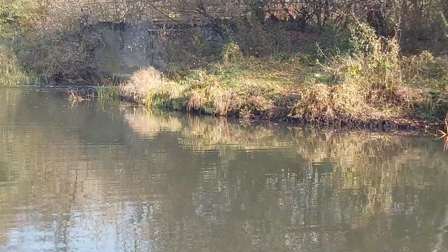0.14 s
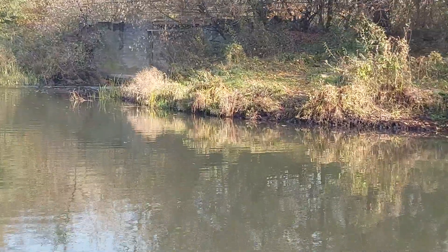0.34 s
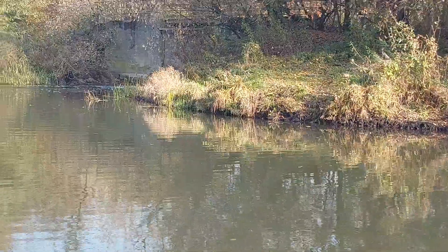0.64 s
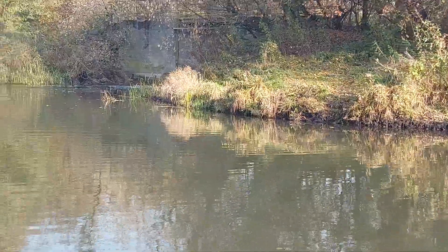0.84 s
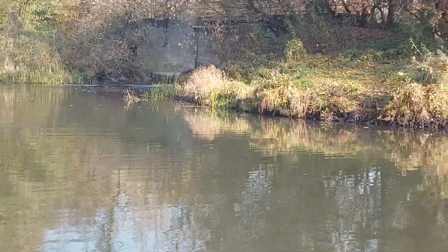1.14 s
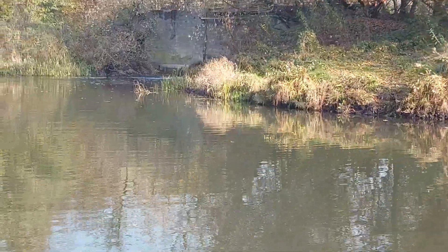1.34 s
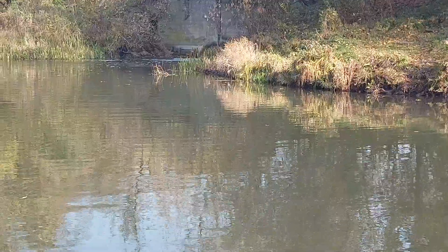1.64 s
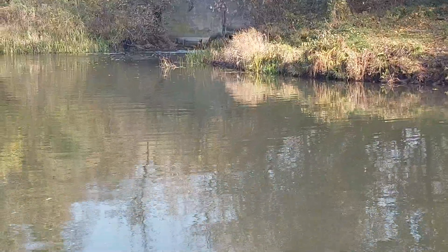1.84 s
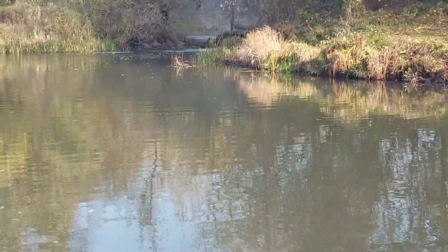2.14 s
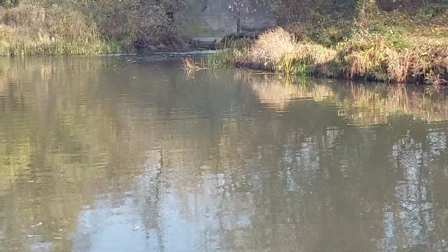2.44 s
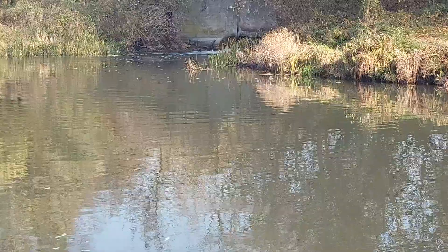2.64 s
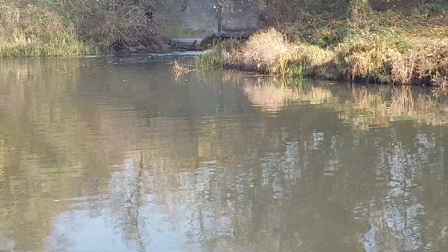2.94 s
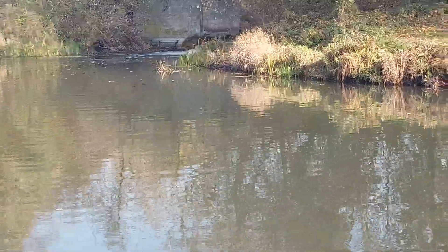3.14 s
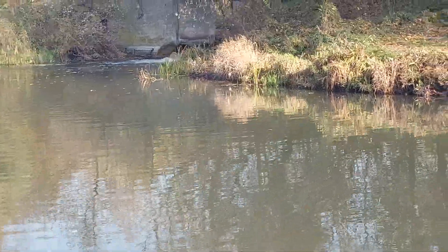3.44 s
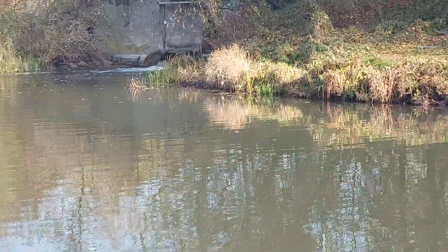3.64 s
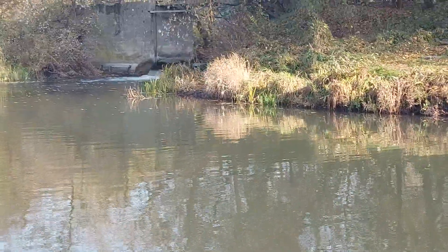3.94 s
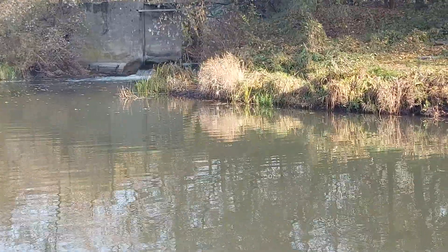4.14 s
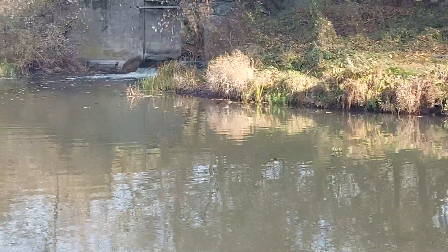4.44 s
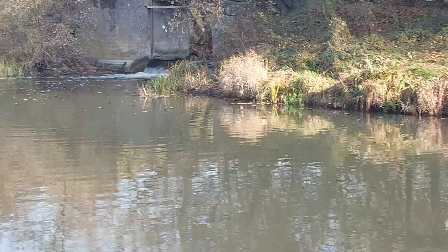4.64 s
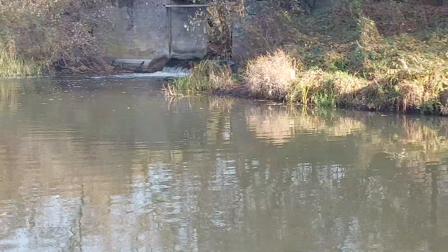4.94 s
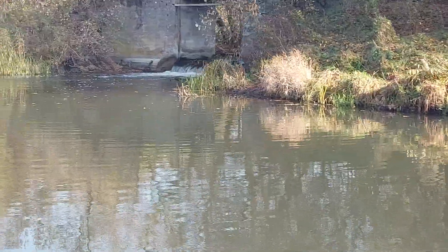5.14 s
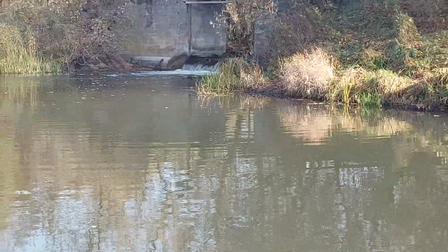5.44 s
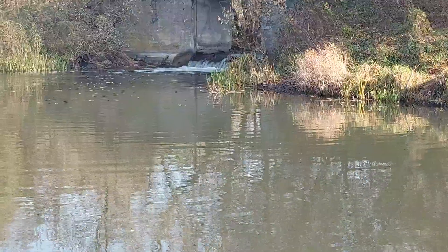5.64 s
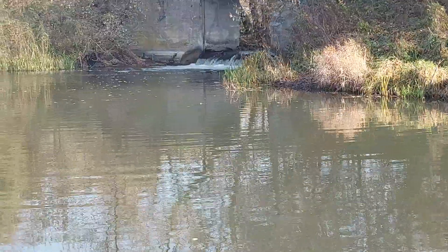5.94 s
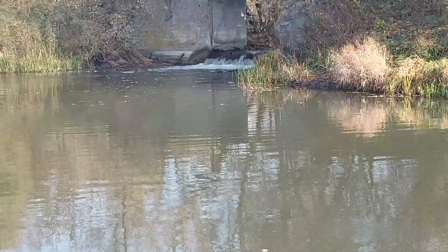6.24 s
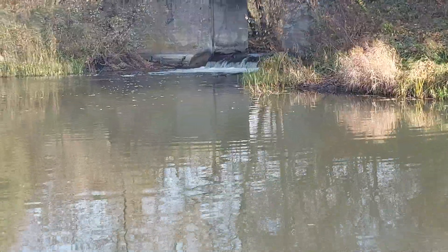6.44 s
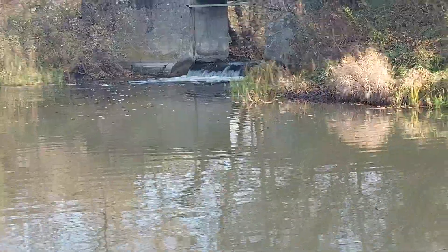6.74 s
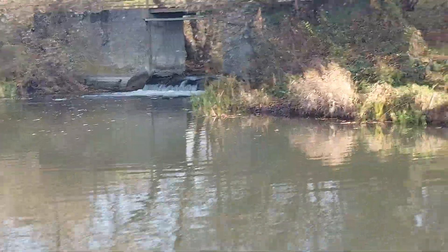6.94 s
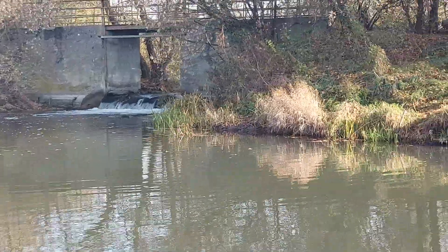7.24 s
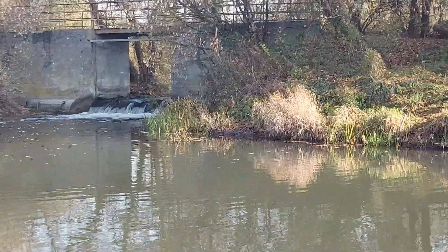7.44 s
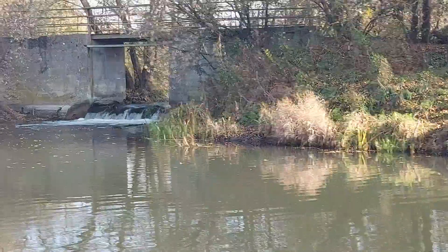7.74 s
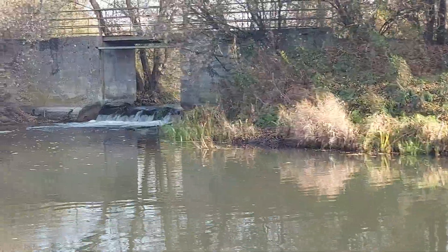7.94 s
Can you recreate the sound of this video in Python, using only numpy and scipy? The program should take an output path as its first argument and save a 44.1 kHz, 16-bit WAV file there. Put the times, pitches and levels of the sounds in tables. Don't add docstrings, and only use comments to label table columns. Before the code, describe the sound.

Throughout about 8 seconds, a small outboard motor runs at unchanging cruising speed, close to a handheld phone outdoors. Its deep, buzzy drone, pulsing about 33 times a second, wavers slightly as water and air pockets cover the exhaust, with gurgling bubbles, faint gear whine and soft rapid valve ticking. Wake wash and fizzing spray run continuously in uneven surges. Dull wavelet knocks come often from 0 to 3.2 s, then between 3.8 and 6.1 s, with another at 7.7 s. Tiny drops snap on the hull, clustering around 4.3-4.9 s and sharpest at 6.0 s. Low wind buffets swell repeatedly from 0.5 to 5 s, with a bigger pop near 5.0 s and another gust near 6.7 s. Very faint high pings from a loose ring occur around 3.7-4.0, 5.1, 5.7-6.0 and 6.9 s. A weir's hiss gradually grows; nothing stops at the end.

```python
import sys
import numpy as np
from scipy import signal
from scipy.fft import rfft, irfft, next_fast_len
from scipy.io import wavfile
from scipy.ndimage import uniform_filter1d, map_coordinates

SR = 44100
rng = np.random.default_rng(int(sys.argv[2]) if len(sys.argv) > 2 else 0)


def field_ratio(decibels):
    return 10 ** (np.asarray(decibels, dtype=float) / 20)


def put_to_file(sound):
    columns = np.atleast_2d(sound).T
    safe = np.clip(columns, -1, 1)
    whole_steps = np.round(safe * 32767)
    wavfile.write(sys.argv[1], SR, whole_steps.astype(np.int16))


N = 357210


# t/s, firing rate/Hz
FIRING_RATE = [(0.0, 33.322), (0.68, 33.329), (1.35, 33.347), (2.02, 33.356), (2.7, 33.407), (3.37, 33.326),
               (4.05, 33.275), (4.72, 33.428), (5.4, 33.408), (6.07, 33.397), (6.75, 33.266),
               (7.42, 33.272), (8.1, 33.301)]
# t/s, load/dB, cover/dB
OUTLET_WATER = [(0.0, -2.5, -11), (0.47, 2, 1.5), (0.84, -2.5, -4.8), (1.43, 3, 2.2), (1.59, 0, 4.5),
                (2.58, 1.5, 2), (3.29, -0.7, 5), (3.99, 0, -6.5), (4.31, -3.5, 2), (4.63, -0.2, 0),
                (5.05, -1.5, 2.5), (5.29, 0.5, -4), (5.77, 1, 2.6), (6.0, 0.1, -3), (7.01, 0.5, 5),
                (7.35, 0.9, -3), (7.57, 0.3, 5), (8.1, -0.5, -4.5)]
# order, peak level/dB, change per load/(dB/dB), change per cover/(dB/dB), bubble flutter/dB
MAIN_ORDERS = [(3, -19.5, 1.04, -0.03, 1), (4, -21.5, -0.2, .95, 1.15), (5, -29, 0, -.5, 0.6)]
# order, peak level/dB
OTHER_ORDERS = [(1, -45.5), (2, -31), (6.5, -47), (7, -68)]
# order, level against that mode/dB
UPPER_ORDERS = [(8, -11), (9, -7), (10, -8.5), (12, -20)]
# t/s, length/s, 5th order change/dB, 4th order change/dB, 4th order lead/rad
AIR_POCKETS = [(.2, .08, 1, 4, 0), (.85, 0.092, 2.5, -2.5, 1.6), (1.047, .1, 3.5, 3.5, .3),
               (1.267, .08, 1.5, -2.5, -.3), (1.95, .08, -2, 3, 0), (2.652, 0.1, 5, 0, .7),
               (3.494, 0.076, 1.5, -0.5, .3), (3.68, .07, -1, 1.5, 0), (4.207, 0.13, 1.5, 0.5, 1.1),
               (4.43, 0.062, -2, 2, 0), (4.702, 0.33, 1, 0, -.4), (4.95, .08, -4, 0.5, .2),
               (5.32, .06, 0.5, -2, 0), (5.6, 0.5, .6, 0, -1.1), (6.12, .15, 3.5, -1.5, .5),
               (6.65, .1, 2, 1, 0), (7.55, 0.17, 4, 0.5, 0), (7.95, 0.12, 1.5, -2, .5)]
# t/s, change/dB, length/s
TRANSOM_SWELLS = [
    (.2, 5, 0.65),
    (1.15, 6, .5),
    (2.5, 1, 0.37),
    (5.7, 7, .45),
    (6.7, 4, 0.36),
    (7.8, -5, .15),
]
HULL_SIDES = {2: (2.3, -.1), 4: (1.3, .03), 5: (-1, .12), 6: (3, .12), 8: (3.6, -.08), 9: (-1.1, .25),
              10: (2, .2)}
# f/Hz, width/Hz, level/dB
EXHAUST_LEG = [(118, 25, 0)]
# f/Hz, width/Hz, level/dB
ENGINE_MOUNT = [(50, 15, 0)]
# f/Hz, width/Hz, level/dB
OUTLET_BUBBLES = [(117, 25, 4), (308, 83, -16)]
# f/Hz, width/Hz, level/dB
ENGINE_COVER = [(1800, 250, 4.5), (2770, 1200, -2.5), (5500, 2100, -7.5)]
# f/Hz, peak level/dB
GEAR_TONES = [(1241, -49), (1289, -50), (1307, -52)]
# f/Hz, level per Hz/dB
WASH_COLOUR = [(25, -18), (50, -19), (85, 0), (150, 1.5), (240, -6), (340, -7), (520, -10), (860, -14),
               (1400, -13), (2400, -19.5), (4000, -29.5), (8000, -72)]
# t/s, change/dB, length/s
WAKE_SWELLS = [
    (1.45, 1.9, .12),
    (2.15, -1.5, 0.63),
    (3.0, -0.5, .08),
    (3.13, 2, 0.022),
    (3.55, -1.6, 0.15),
    (4.6, 0, 0.3),
    (5.1, -1.5, .2),
    (6.2, 1.4, 0.66),
    (7.9, -1.1, .2),
]
# f/Hz, level per Hz/dB
SPRAY_COLOUR = [(800, -24), (2000, 0.5), (3400, 2), (4400, -4.5), (6500, -10), (8500, -5), (11000, -12.5),
                (13000, -12.5), (16000, -24)]
# t/s, level over the hiss/dB, length/s
SPRAY_SURGES = [(.1, 3.5, 0.071), (.45, 3, .04), (.65, -3, .05), (.88, 1.5, .06), (1.33, 1.5, .08),
                (1.7, -2, .06), (2.1, 1.2, .3), (2.85, 2.4, .15), (3.5, -2, 0.2), (3.79, -2, .04),
                (4.0, 3, 0.079), (4.28, -2, 0.052), (4.6, 3, 0.23), (5.05, -2, .1), (5.2, 2, 0.046),
                (5.5, 1.6, .05), (5.82, 3.5, .06), (6.0, 2.5, .04), (6.29, 1.5, .04), (6.52, 1.5, 0.17),
                (6.95, -3, .1), (7.12, 2.5, 0.044), (7.4, 2, 0.11), (7.94, 2.5, 0.045)]
# t/s, peak level/dB, left-right/dB, brightness/dB
DROPS = [(0.1534, -37, -3.0, -12), (0.5212, -34, -4.5, -21), (1.1972, -34, -3.5, -19),
         (1.9435, -35, -4.5, -20), (2.382, -29, -3.5, -23), (2.9632, -33, -2.5, -16),
         (3.4047, -35, -2.0, -19), (4.2747, -34, -2.5, -22), (4.3535, -35, 0, -24),
         (4.4194, -39, -2.5, -16), (4.5735, -28, -1.5, -23), (4.7394, -35, -2.5, -16),
         (4.8334, -30, -3.0, -13), (4.8544, -28, -2, -19), (5.1701, -35, -2.5, -18),
         (5.5944, -37, -2.5, -15), (5.7214, -35, -1.5, -17), (5.8754, -33, -4.0, -19),
         (6.0282, -22, -10, -23), (6.0536, -34, -2.5, -21), (6.1295, -32, -1.5, -19),
         (6.2721, -32, -3.0, -22), (6.6664, -30, -1.5, -18), (6.7281, -35, -2.5, -19),
         (6.7984, -34, -1.0, -20), (8.0506, -33, -3.5, -19)]
# t/s, peak level/dB, f/Hz
WAVELETS = [(0.03, -23, 330), (0.508, -21, 293), (0.689, -22, 294), (1.049, -17.5, 318), (1.648, -29, 250),
            (1.828, -24, 256), (2.128, -21, 306), (2.427, -22, 308), (2.846, -26, 332), (3.147, -22, 295),
            (3.809, -18.5, 297), (4.286, -30, 360), (4.496, -22.5, 308), (4.943, -17, 240),
            (5.337, -18.5, 320), (5.603, -20, 231), (6.082, -17, 221), (7.699, -22, 233)]
# t/s, peak level/dB
RING_SHAKES = [(3.7085, -49), (3.8067, -54), (3.8921, -54), (3.9664, -54), (5.0818, -50), (5.7399, -48),
               (5.7573, -49), (5.8047, -46), (5.8144, -51), (6.0137, -47), (6.8528, -50)]
# t/s, level over the calm/dB, length/s
WIND_GUSTS = [(.6, 10, 0.37), (1.12, 12, 0.15), (1.45, 13, .25), (1.8, 10, .2), (2.15, 8, .2),
              (2.72, 15, .3), (3.2, 10, .25), (3.68, 15, 0.23), (4.34, 16, .12), (4.65, 7, .15),
              (4.97, 14, .12), (6.2, 3, .3), (6.74, 11, 0.083), (7.1, 3, .2)]
# t/s, peak level/dB, left-right/dB
WIND_POPS = [
    (1.945, -29, 5),
    (2.69, -29, -6),
    (4.86, -32, 6),
    (4.99, -17, 10),
]
# f/Hz, likeness (1 = same)
LIKENESS = [(60, 0.99), (200, 0.9), (350, 1), (700, 0.51), (1100, 0.67), (1800, 0.42), (3400, 0.28),
            (5000, 0.28), (9000, .04)]
# f/Hz, left-right/dB
BODY_SHADE = [(60, -0.4), (250, 0.9), (500, 0), (1000, -1.5), (1700, -5), (3400, -4), (5000, .5),
              (6500, 4.5), (11000, 2.5), (15000, -.8)]
# f/Hz, left lag/rad
BODY_LAG = [(20, .1), (100, 0.17), (340, 0.56), (520, 0.32), (780, 1.02), (1290, 1.94), (1720, 4.9),
            (2240, 3.4), (4220, 3.34), (6700, 7.6)]
# f/Hz, width/Hz, level/dB
PORT_DIPS = [(8810, 1420, -12), (9530, 690, -9.5)]

FLUTTER_PER_S = 6.5
SIXTH_DB = -38.5
UPPER_DB, UPPER_SWING_DB = -32, 1.6
TENTH_FADE_DB_PER_S = 0.5
WASH_DB, WASH_SWING_DB = -34, 0.42
SPRAY_DB, SPRAY_SWING_DB = -50.5, 0.5
WEIR_M, BOAT_M_PER_S = 20.4, 1.33
CALM_DB = -56.5
TOP_HZ = 15750
TIME_S = np.arange(N) / SR
SIDES = np.array([[0.5], [-0.5]])


def engine():
    cycles = np.cumsum(curves(FIRING_RATE)[0]) / SR + 0.494
    upper_db = UPPER_DB + UPPER_SWING_DB * wobble(FLUTTER_PER_S)
    chance = rng.standard_normal((int(cycles[-1]) + 2, 2))
    sound = exhaust_drone(cycles, upper_db) + burble(cycles, chance[:, 0])
    sound = sound + gear_whine() + casing_hum()
    return sound + valve_tick(cycles, chance[:, 1]) + exhaust_breath(cycles, upper_db)


def exhaust_drone(cycles, upper_db):
    drone, firing_hz = np.zeros((2, N)), cycles[-1] * SR / N
    levels, pocket_lead = order_levels(upper_db)
    for order, db in levels:
        hz = order * firing_hz
        lag = np.angle(resonances(EXHAUST_LEG)(hz) * resonances(ENGINE_MOUNT)(hz))
        drift_rad = 0.4 if order > 6 else 0.22 if order > 3 else 0.12
        drift = drift_rad * wobble(2.5) + pocket_lead * (order == 4)
        hull_db, hull_lead = np.multiply.outer(HULL_SIDES.get(order, (0, 0)), SIDES)
        phase = 2 * np.pi * order * cycles + lag + drift + hull_lead
        drone += field_ratio(db + hull_db) * np.sin(phase)
    return drone


def order_levels(upper_db):
    load_db, cover_db = curves(OUTLET_WATER)
    fifth_db, fourth_db, pocket_lead = (
        swells([(row[0], row[column], row[1]) for row in AIR_POCKETS]) for column in (2, 3, 4))
    pocket_db = {4: fourth_db, 5: fifth_db}
    levels = []
    for order, db, per_load, per_cover, flutter_db in MAIN_ORDERS:
        water_db = per_load * load_db + per_cover * cover_db
        flutter = flutter_db * wobble(FLUTTER_PER_S)
        levels.append((order, db + water_db + flutter + pocket_db.get(order, 0)))
    levels += [(order, db + 0.32 * wobble(2.55)) for order, db in OTHER_ORDERS]
    levels.append((6, SIXTH_DB + swells(TRANSOM_SWELLS) + 1.1 * wobble(4)))
    for order, db in UPPER_ORDERS:
        fade_db = (order > 9) * TENTH_FADE_DB_PER_S * (TIME_S - 3)
        levels.append((order, upper_db + db + 1.9 * wobble(4) - fade_db))
    return levels, pocket_lead


def burble(cycles, strength):
    turn = cycles.astype(int)
    firing = np.diff(turn, prepend=turn[0])
    colour = lambda hz: resonances(OUTLET_BUBBLES)(hz) * resonances([(200, 400, 0)])(hz)
    return field_ratio(-40.5) * unit(filtered(firing * strength[turn], colour))


def exhaust_breath(cycles, upper_db):
    puffs = (1 + 0.3 * np.cos(2 * np.pi * (cycles - 0.69))) * rng.standard_normal((2, N))
    return field_ratio(upper_db - 5.5) * spread(puffs, resonances([(312, 324, 0)]))


def valve_tick(cycles, strength):
    valve = cycles - 0.27
    gate = np.exp(-(valve % 1) / 0.1) * field_ratio(3.4 * strength[valve.astype(int)])
    return field_ratio(-50.5) * spread(gate * rng.standard_normal((2, N)), resonances(ENGINE_COVER))


def gear_whine():
    whine = np.zeros(N)
    for hz, db in GEAR_TONES:
        level = field_ratio(db + 2.5 * wobble(7))
        whine += level * np.sin(2 * np.pi * hz * TIME_S + 0.8 * wobble(10))
    return whine


def casing_hum():
    return field_ratio(-48.0) * spread(rng.standard_normal((2, N)), resonances([(843, 33, 0)]))


def gurgle():
    stream = bubbles(per_second=70, low_hz=220.6, cycles=3.8, size=1800)
    return field_ratio(-44.5) * spread(stream, resonances([(350, 440, 0)]))


def water():
    wash_db = WASH_DB + swells(WAKE_SWELLS) + WASH_SWING_DB * wobble(13)
    closer_db = -20 * np.log10(1 - BOAT_M_PER_S * TIME_S / WEIR_M)
    spray_db = SPRAY_DB + closer_db + swells(SPRAY_SURGES) + SPRAY_SWING_DB * wobble(18)
    surge = wobble(16)
    wash = spread(patchy(patchy_db=1.0), lambda hz: field_ratio(along(WASH_COLOUR, hz)))
    wash = field_ratio(wash_db + 4.5 + 0.27 * surge) * wash
    bursts = bubbles(per_second=900, low_hz=2950, cycles=1.16, size=128)
    fizz = unit(patchy(patchy_db=1.5)) + 0.48 * bursts
    lumps = field_ratio(0.13 * surge + 1.2 * wobble(45))
    spray = spread(fizz, lambda hz: field_ratio(along(SPRAY_COLOUR, hz)))
    return wash + field_ratio(spray_db + 3.0) * lumps * spray


def slaps():
    out, t = np.zeros(N + SR), np.arange(1500) / SR
    for s, db, hz in WAVELETS:
        shape = t / 0.0035 * np.exp(1 - t / 0.0038)
        out[round(s * SR):][:len(t)] += field_ratio(db - 3) * np.sin(2 * np.pi * hz * t) * shape
    return out[:N]


def spits():
    dull, bright = np.zeros((2, 2, N + SR))
    t = np.arange(200) / SR
    for s, db, pan_db, bright_db in DROPS:
        decay = field_ratio(-60 * t / 0.007)
        snap = decay * np.sign(rng.standard_normal((2, len(t)))) * field_ratio(db + 2.5 + SIDES * pan_db)
        start = round(s * SR)
        dull[:, start:start + len(t)] += snap
        bright[:, start:start + len(t)] += snap * field_ratio(bright_db + 13.0)
    knock = filtered(dull[:, :N], resonances([(4230, 1200, 3.5), (7000, 3000, -4)]))
    return knock + filtered(bright[:, :N], resonances([(12000, 5000, 0)]))


def jingle():
    out, t = np.zeros(N + SR), np.arange(500) / SR
    for s, db in RING_SHAKES:
        hz = 13000 + 120 * rng.standard_normal()
        shape = t / 0.002 * np.exp(1 - t / 0.0018)
        out[round(s * SR):][:len(t)] += field_ratio(db - 1.5) * np.sin(2 * np.pi * hz * t) * shape
    return out[:N]


def breeze():
    lumps = field_ratio(7.6 * np.tanh(0.7 * np.array([wobble(14), wobble(14)])))
    rumble = filtered(rng.standard_normal((2, N)), lambda hz: resonances([(68, 75, 0)])(hz) ** 2)
    buffet = field_ratio(CALM_DB + swells(WIND_GUSTS) + 6) * unit(lumps * rumble)
    push = np.zeros((2, N))
    for s, db, pan_db in WIND_POPS:
        push[:, round(s * SR)] = field_ratio(db + 34 + SIDES[:, 0] * pan_db) * [1, -1]
    return buffet + filtered(push, lambda hz: resonances([(110, 200, 0)])(hz) ** 2)


def bubbles(per_second, low_hz, cycles, size):
    draw = rng.random((2, int(per_second * N / SR), 3))
    hz = low_hz * field_ratio(14.33 * draw[..., 1:2])
    t = np.arange(size) / SR
    life = t * hz / cycles
    tone = np.sin(2 * np.pi * hz * t * (1 + 0.062 * life))
    grains = field_ratio(10.5 * draw[..., 2:] ** 3) * tone * np.exp(-life)
    at = (draw[..., :1] * N).astype(int) + np.arange(size)
    return unit(np.array([np.bincount(a.ravel(), g.ravel(), N + size)[:N] for a, g in zip(at, grains)]))


def patchy(patchy_db):
    z = signal.stft(rng.standard_normal((2, N)), nperseg=512)[2]
    field = rng.standard_normal(z.shape[1:])
    for axis in (0, 1):
        field = uniform_filter1d(field, size=8, axis=axis)
    return signal.istft(z * field_ratio(patchy_db * unit(field)), nperseg=512)[1][:, :N]


def spread(pair, colour):
    turn = lambda hz: np.arccos(np.clip(along(LIKENESS, hz), -1, 1)) / 2
    mid, side = filtered(pair, lambda hz: colour(hz) * [np.cos(turn(hz)), np.sin(turn(hz))])
    return unit(np.array([mid + side, mid - side]))


def resonances(modes):
    def mode(f, c, w, db):
        return field_ratio(db) * 1j * f * w / (c * c - f * f + 1j * f * w)
    return lambda f: sum((-1) ** k * mode(f, *row) for k, row in enumerate(modes))


def filtered(x, response):
    m = next_fast_len(N + SR // 2)
    return irfft(rfft(x, m) * response(np.fft.rfftfreq(m, 1 / SR)), m)[..., :N]


def swells(rows):
    return sum(db * np.exp(-((TIME_S - s) / length) ** 2) for s, db, length in rows)


def wobble(rate):
    points = rng.standard_normal(int(N * rate / SR) + 4)
    return map_coordinates(points, [np.arange(N) * rate / SR])


def curves(rows):
    s, *columns = np.transpose(rows)
    return [np.interp(TIME_S, s, column) for column in columns]


def along(points, hz):
    f, v = np.transpose(points)
    return np.interp(np.log(hz + 1), np.log(f + 1), v)


def unit(x):
    return x / np.sqrt(np.mean(x ** 2) + 1e-20)


def scene():
    body = lambda hz: field_ratio(SIDES * along(BODY_SHADE, hz)) * np.exp(-1j * SIDES * along(BODY_LAG, hz))
    around = engine() + gurgle() + slaps() + water()
    return filtered(around, body) + spits() + jingle() + breeze()


def roll_off(x):
    return signal.sosfilt(signal.butter(12, 15740, fs=SR, output="sos"), x)


def record(dry):
    def ports(hz):
        dips_db = [db * np.exp(-((hz - c) / w) ** 2) for c, w, db in PORT_DIPS]
        return field_ratio(np.array(dips_db)) * (hz < TOP_HZ)
    return roll_off(filtered(dry, ports))


dry = scene()
out = record(dry)
put_to_file(out)
```